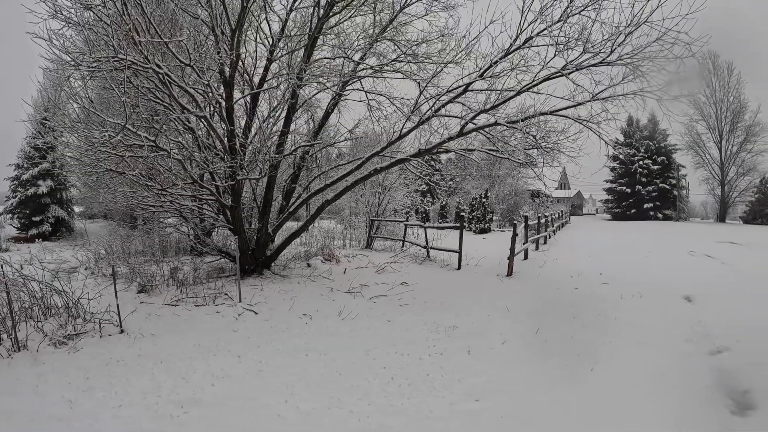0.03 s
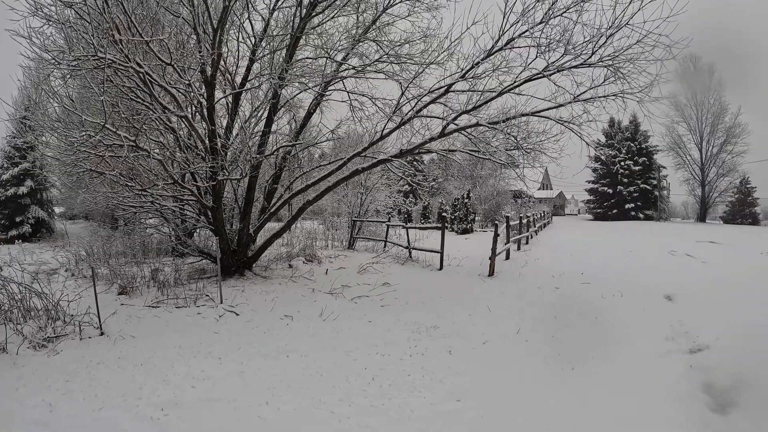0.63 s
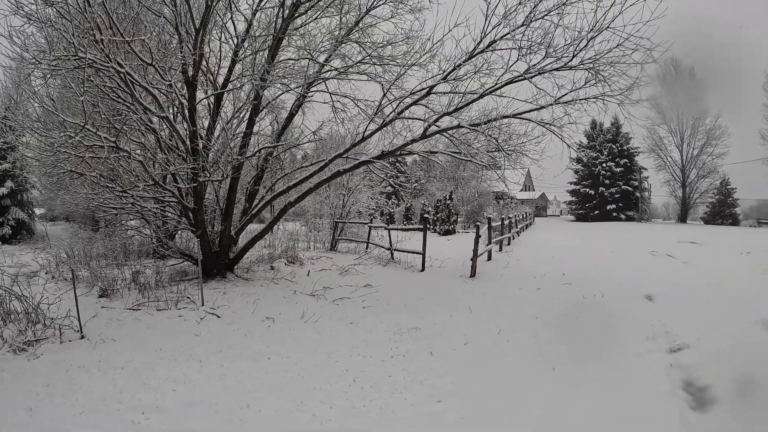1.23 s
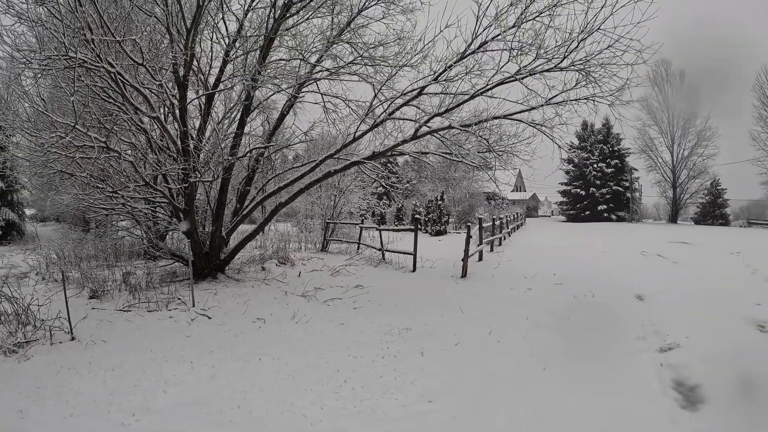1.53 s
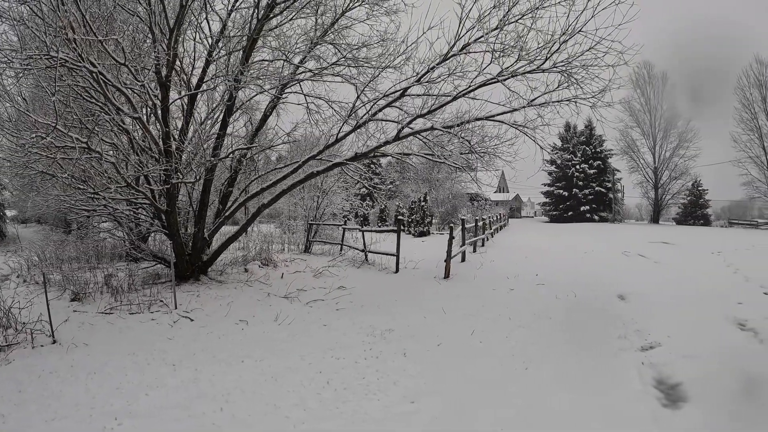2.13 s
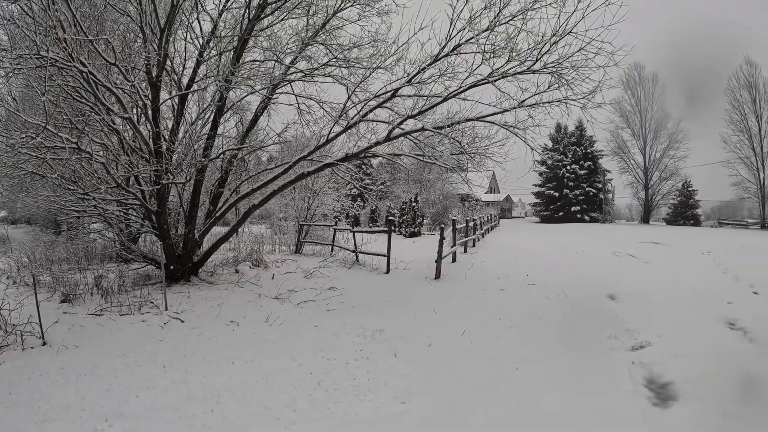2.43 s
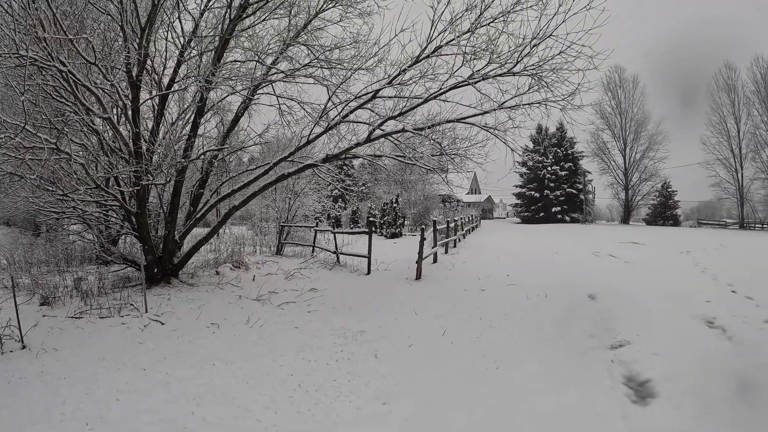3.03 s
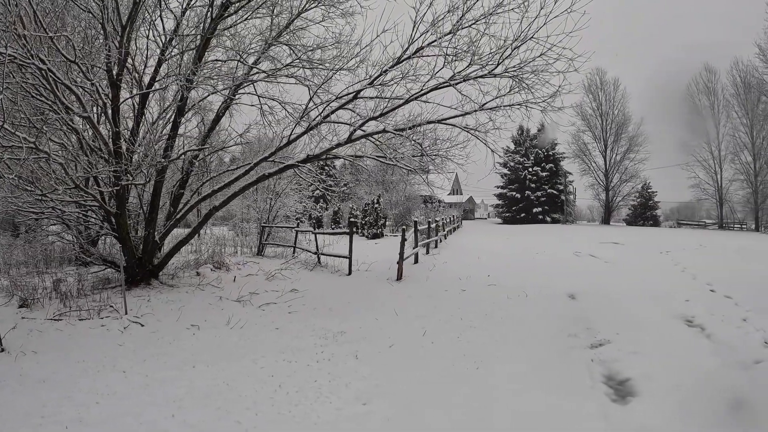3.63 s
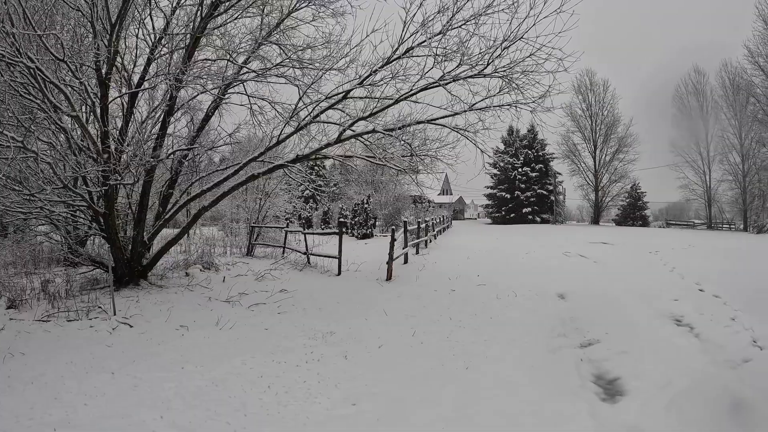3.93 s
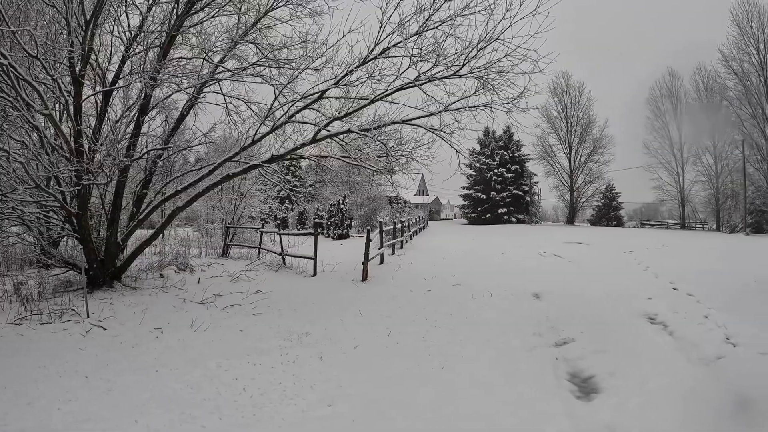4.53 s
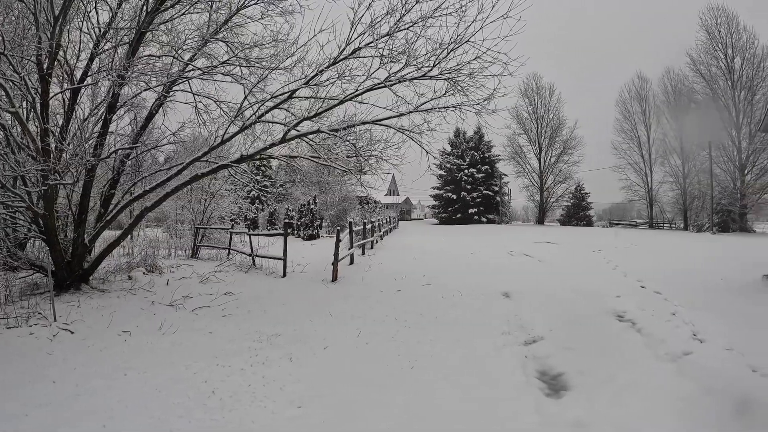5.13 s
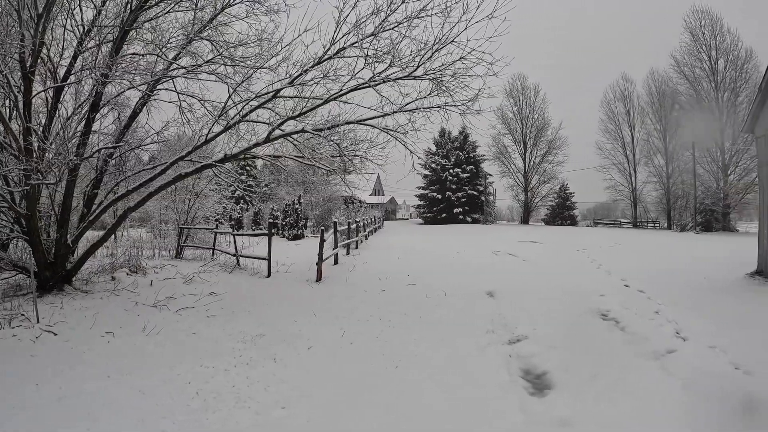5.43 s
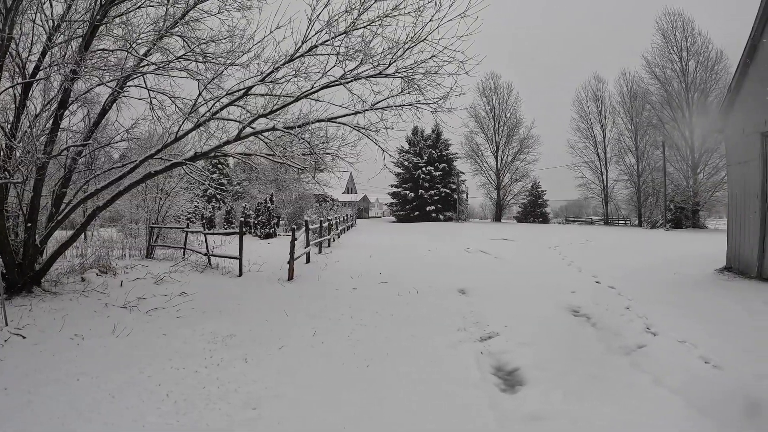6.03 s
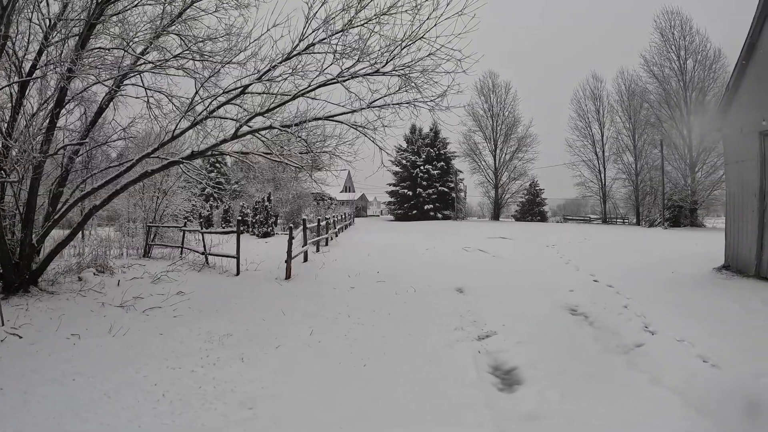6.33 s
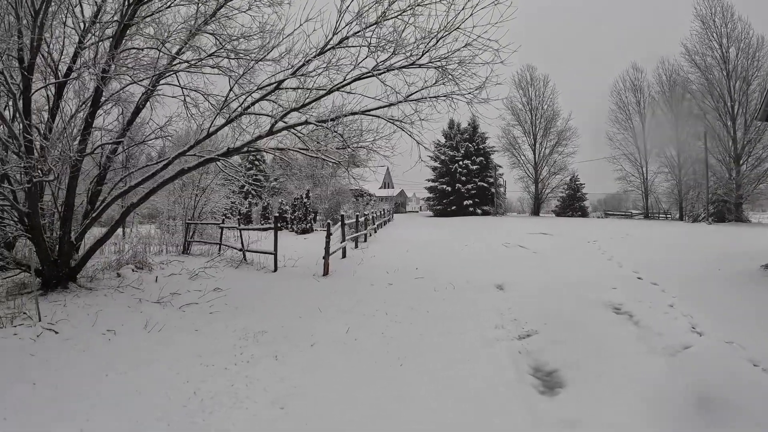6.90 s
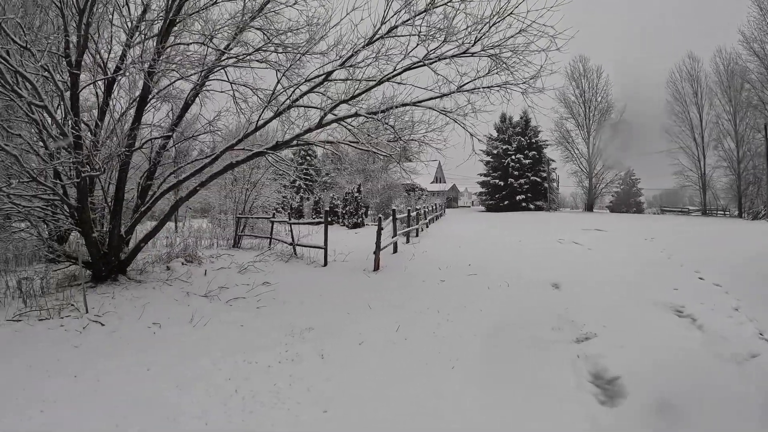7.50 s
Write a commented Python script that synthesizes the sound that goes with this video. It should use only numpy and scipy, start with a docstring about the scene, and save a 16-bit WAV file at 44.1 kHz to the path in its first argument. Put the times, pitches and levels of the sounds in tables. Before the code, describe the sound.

Geese call in the distance from start to finish, slightly to the right, in snowy woods. Their hoarse barks, clear honks, low moans and brief high yelps overlap irregularly, several a second, with a short echo from the trees. The calls are a little stronger around 2 to 3 seconds and somewhat weaker after 6. A low wind rumble on the hand-held microphone starts gently and builds from about 3 seconds, with gusts near 5.7, 6.4 and 7.5 seconds. Soft, dull knocks bump the microphone now and then, more often around 3 and 5 seconds and near the end. Snow grains tick and patter lightly close by throughout. Small birds whistle and chirp very faintly, mostly between 3 and 6 seconds. At about 7 seconds, snow gives one short, soft crunch underfoot. A quiet wash of open country air lies beneath everything.

```python
"""Geese call without pause beyond snowy woods: hoarse barks, clear honks, low moans and high yelps.
Each call is a harmonic tone of the syrinx that starts rough and breaks into full voice; trunks
scatter it into a short reverberation. A rising breeze buffets the hand-held microphone, with soft
knocks. Snow grains tick close by, snow crunches once underfoot, and small birds whistle faintly
over the wash of open country."""
import sys
import numpy as np
from scipy import signal
from scipy.fft import rfft, irfft, next_fast_len
from scipy.io import wavfile

SR = 44100
rng = np.random.default_rng(int(sys.argv[2]) if len(sys.argv) > 2 else 0)


def log_audio(samples):
    """Write samples as a 16-bit WAV file to the path given in sys.argv[1]."""
    # one column per channel
    frames = np.atleast_2d(samples).T
    # limit to full scale, then quantise
    limited = np.clip(frames, -1, 1)
    pcm = np.round(limited * 32767).astype(np.int16)
    wavfile.write(sys.argv[1], SR, pcm)


N = 342216
T = np.arange(N) / SR


def syrinx(length, hz, shape, fundamental_db, jitter=0.0074, break_s=0.006, rasp_attack_s=0.016):
    """Self-sustained oscillation with a register break, strongest in harmonic 2; returns tone and rasp."""
    start_ratio, end_ratio, third_db, roughness, break_share = shape
    size = int(length * SR)
    u = np.linspace(0, 1, size)
    voiced = .5 + .5 * np.tanh(.5 * (u - break_share) * length / break_s)
    late_glide = (end_ratio - 1) * (2 * u - 1).clip(0) ** 2
    pitch = hz * (start_ratio + (1 - start_ratio) * voiced + late_glide)
    waver = 1 + jitter * (1 + 2 * roughness) * walk(165, size)
    phase = 2 * np.pi * np.cumsum(pitch * waver) / SR
    swell = np.sin(np.pi * u).clip(0) ** .62 * undb(1.5 * walk(55, size))
    harmonics_db = [fundamental_db, 0, third_db, -31, -38]
    tone = sum(undb(db) * np.sin(k * phase) for k, db in enumerate(harmonics_db, 1))
    tone *= undb(-8 * (1 - voiced))  # weaker before the break
    # the motion repeats only every fourth cycle: smeared sidebands between the harmonics
    sidebands = sum(share * np.sin(k * phase / 4 + .8 * walk(50, size))
                    for k, share in ((7, .6), (9, .7), (10, .3)))
    breath = np.random.default_rng(rng.integers(1 << 30)).standard_normal(size) * np.sqrt(SR / 2000)
    hoarseness = roughness * 1.55 * (1 - u) * np.tanh(u * length / rasp_attack_s)
    rasp = hoarseness * (undb(-2) * sidebands + undb(-12) * breath)
    return np.sqrt(2) * swell * np.array([tone, rasp])


# Fundamental of a mid-range call, re harmonic 2: t/s, level/dB
FUNDAMENTAL_LEVEL = [(0, -25.5), (5.3, -30), (5.7, -23), (6.35, -16), (6.55, -25.5), (6.68, -3), (6.8, -21),
                     (6.92, -1.5), (7.02, -22), (7.26, -7.5), (7.7, -13)]

def call(s, length, hz, db, shape, middle_hz=564, db_per_octave=12.5):
    """Spectral balance of one call: the lower the pitch, the weaker the fundamental."""
    fundamental_db = np.interp(s, *np.transpose(FUNDAMENTAL_LEVEL))
    fundamental_db += db_per_octave * np.log2(hz / middle_hz)
    return undb(db) * syrinx(length, hz, shape, fundamental_db)


# Hoarse barks: t/s, f/Hz, level/dB, harmonic 3 re harmonic 2/dB
BARK_CALLS = [(0.005, 686, -56, -27), (0.379, 834, -56.5, -30), (0.698, 799, -55, -25),
              (0.724, 645, -49.5, -16), (0.937, 708, -52, -24), (1.308, 704, -51, -24),
              (1.597, 694, -51.5, -23), (1.956, 688, -49, -24), (2.325, 710, -46, -26.5),
              (3.434, 695, -50.5, -21), (3.698, 683, -53.5, -17), (4.178, 688, -52, -16),
              (4.416, 708, -50.5, -13.5), (4.688, 708, -53, -11.5), (4.98, 755, -51.5, -16),
              (5.251, 738, -54, -19), (6.312, 777, -52.5, -36), (6.644, 756, -60, -28),
              (6.99, 730, -55.5, -22), (7.261, 675, -56.5, -15)]

def barks(length=0.0835):
    """Irregular oscillation makes a short, rough, falling note."""
    for s, hz, db, third_db in BARK_CALLS:
        yield s, call(s, length, hz, db, (0.97, 0.92, third_db, 0.42, 0.28))


# Clear honks: t/s, duration/s, f/Hz, end f/Hz, level/dB
HONK_CALLS = [(0.038, 0.11, 622, 562, -53.5), (0.107, 0.1, 679, 647, -45.5), (0.566, 0.091, 660, 600, -52),
              (0.767, 0.105, 633, 576, -55.5), (1.118, 0.046, 620, 605, -52.5),
              (2.095, 0.064, 665, 582, -51), (3.147, 0.11, 692, 662, -49.5),
              (4.655, 0.032, 700, 715, -53.5), (6.23, 0.12, 613, 630, -59.5), (6.331, 0.115, 660, 610, -54),
              (6.377, 0.17, 683, 671, -55.5), (6.538, 0.1, 620, 640, -60.5), (6.644, 0.086, 660, 600, -69),
              (6.916, 0.063, 648, 640, -61.5), (7.064, 0.09, 660, 682, -54), (7.383, 0.093, 658, 655, -61),
              (7.641, 0.12, 656, 635, -50.5)]

def honks():
    """Nearly periodic oscillation gives a clear note with little rasp."""
    for s, length, hz, end_hz, db in HONK_CALLS:
        yield s, call(s, length, hz, db, (0.96, end_hz / hz, -24, 0.08, 0.13))


# Low moans: t/s, duration/s, f/Hz, end f/Hz, level/dB, cluck re moan/dB,
# harmonic 3 re harmonic 2/dB, share of the duration before the break
MOAN_CALLS = [(0.327, 0.3, 471, 483, -58.5, -25, -15, 0.01), (0.545, 0.2, 504, 493, -51.5, -33, -9, 0.58),
              (0.93, 0.21, 484, 477, -54, -32, -11.5, 0.26), (1.107, 0.19, 507, 457, -51.5, -15, -11, 0.41),
              (1.66, 0.17, 508, 470, -52, -20, -9, 0.25), (2.224, 0.13, 502, 473, -48.5, 0, -8, 0.3),
              (2.997, 0.15, 502.6, 476, -50, -4, -11, 0.24),
              (3.414, 0.14, 514.5, 493, -48.5, -2.5, -10, 0.22),
              (4.017, 0.16, 509, 450, -53, 3.5, -10, 0.147), (4.548, 0.12, 533, 509, -49.5, -4, -18, 0.28),
              (5.157, 0.13, 548.3, 532, -49, -7.5, -18, 0.36),
              (7.215, 0.081, 466, 450, -61.5, -27, -8, 0.15),
              (7.618, 0.088, 477, 515, -54.5, 0.5, -8, 0.47)]

def moans(lead_s=0.038, cluck_s=0.0504, cluck_ratio=1.26):
    """Register jumps: the voice drops from an opening cluck, then steps up to a held pitch."""
    for s, length, hz, end_hz, db, cluck_db, third_db, break_share in MOAN_CALLS:
        yield s - lead_s, call(s, cluck_s, cluck_ratio * hz, db + cluck_db, (0.92, 1.02, -24, 0.2, 0.4))
        yield s, call(s, length, hz, db, (0.91, end_hz / hz, third_db, 0.12, break_share))


# High yelps: t/s, f/Hz, level/dB
YELP_CALLS = [(2.465, 790, -52), (2.835, 756, -61), (3.14, 780, -52), (3.826, 776, -52.5),
              (4.21, 771.5, -53), (5.61, 772, -50.5), (5.984, 768, -50), (6.58, 733, -58.5),
              (6.795, 727, -61.5), (7.402, 744, -57.5), (7.6, 757, -57.5)]

def yelps(length=0.056):
    """Weak upper harmonics leave a brief, almost pure falling tone."""
    for s, hz, db in YELP_CALLS:
        yield s, call(s, length, hz, db, (1.01, 0.94, -34, 0.16, 0.1))


# Nasal wails: t/s, duration/s, f/Hz, harmonic 2 level/dB, harmonic 3 level/dB
WAIL_CALLS = [(0.3, 0.286, 589, -58, -77), (0.86, 0.17, 641, -70, -70.5), (1.109, 0.21, 619, -64.5, -65.5),
              (2.312, 0.2, 638, -56, -60.5), (5.483, 0.194, 646, -89, -67),
              (5.784, 0.22, 632, -72.5, -64.5), (6.994, 0.165, 637.6, -58, -66),
              (7.294, 0.15, 644, -68, -63.5)]

def wails(quaver_db=3):
    """Random amplitude modulation sets a note with a strong third harmonic quavering."""
    for s, length, hz, db, third_db in WAIL_CALLS:
        wail = call(s, length, hz, db, (0.96, 0.955, third_db - db, 0.25, 0.25))
        yield s, wail * undb(quaver_db * walk(68, wail.shape[1]))


# Throat resonance: f/Hz, gain/dB
THROAT_RESPONSE = [(500, -9.5), (820, -8.5), (950, 7), (1400, 11), (1800, -3.5), (2100, -31), (5000, -81)]

def throats(calls):
    """Source and filter: sums (onset, call) pairs, the throat resonance shaping only their rasp."""
    voices = np.zeros((2, N))
    for s, sound in calls:
        add(voices, s, sound)
    tone, rasp = voices
    return tone + colour(rasp, THROAT_RESPONSE)


# Chatter of the rest of the flock: t/s, level/dB
FLOCK_LEVEL = [(0, -78), (.45, -65), (1.6, -76), (5.8, -84), (6.17, -63), (6.5, -71), (7.76, -76)]

def far_geese(count=80, middle_hz=620, shortest_s=0.0894, range_octaves=0.55):
    """Superposition: faint barks of random timing and pitch add up to distant chatter."""
    calls = []
    for k, (when, stretch, voice) in enumerate(rng.random((count, 3))):
        hz = middle_hz * 2 ** (range_octaves * (voice - .5))
        bark = syrinx(shortest_s * (1 + stretch), hz, (0.97, 0.92, -19, 0.45, 0.28), fundamental_db=-22)
        calls.append(((k + when) / count * N / SR, bark))
    return throats(calls) * undb(curve(FLOCK_LEVEL))


def woods(x, t60_s=0.42, build_s=0.015, echo_db=-12):
    """Multiple scattering from trunks adds a tail that builds up and decays exponentially."""
    t = T[:SR]
    mid, side = rng.standard_normal((2, SR)) * undb(-60 * t / t60_s) * (1 - np.exp(-t / build_s))
    echo = widen(mid, side, side_db=-9) / np.sqrt(np.sum(mid ** 2))
    return x + undb(echo_db) * signal.fftconvolve(x[None], echo, axes=1)[:, :N]


# Strength of the buffeting: t/s, level/dB
BREEZE_LEVEL = [(0.0, -50), (3.35, -43), (3.46, -52), (3.63, -38.5), (3.87, -47), (4.8, -37), (6.57, -39.5),
                (6.65, -42), (7.76, -35.5)]
# Gusts: t/s, width/s, level/dB
GUST_PEAKS = [(2.994, 0.12, -46), (4.36, 0.05, -54), (4.85, 0.32, -53.5), (5.368, 0.098, -51),
              (5.697, 0.064, -40.5), (6.15, 0.52, -56), (6.426, 0.05, -40), (7.08, 0.094, -52),
              (7.53, 0.11, -46), (7.73, 0.02, -43)]
# Spectra of the slow buffeting and of the eddies: f/Hz, level/dB
BUFFET_SPECTRUM = [(12, -3.5), (25, 5), (55, -4.5), (100, -15), (200, -27), (450, -71)]
EDDY_SPECTRUM = [(50, 2), (170, 4), (270, -1.5), (400, -20.5), (600, -34), (2500, -118)]

def wind(lumps_db=2.8):
    """Turbulence: pressure swings slowly at the microphone ports, and gusts break into faster eddies."""
    buffet = stereo_noise(BUFFET_SPECTRUM, side_db=-5) * undb(curve(BREEZE_LEVEL) - 1 + 2 * walk(14))
    gust_power = sum(undb(db) ** 2 * np.exp(-((T - s) / width) ** 2) for s, width, db in GUST_PEAKS)
    eddies = stereo_noise(EDDY_SPECTRUM, side_db=-0.44) * np.sqrt(gust_power)
    lumps = undb(0.5 + lumps_db * walk(45))
    return buffet * pan(-0.23) + eddies * lumps * pan(-1.1)


# Soft knocks on the microphone: t/s, peak level/dB, f/Hz, width/s
KNOCK_PULSES = [(0.288, -35.5, 67.5, 0.0036), (1.798, -30.5, 39, 0.0061), (2.718, -32.5, 158, 0.0045),
                (2.982, -32, 167, 0.0029), (3.034, -30, 30.2, 0.0088), (3.294, -26, 35.5, 0.0037),
                (3.301, -36, 161, 0.0022), (4.483, -48.5, 400, 0.0011), (4.741, -31.5, 160, 0.002),
                (4.887, -47, 356, 0.00073), (4.957, -34, 148, 0.0037), (4.991, -37.5, 247, 0.00077),
                (5.066, -26.5, 39.7, 0.0066), (5.215, -25, 40.7, 0.016), (5.362, -34.5, 162, 0.0049),
                (5.635, -35, 119, 0.0046), (6.188, -37.5, 169, 0.0035), (6.495, -29, 31.7, 0.032),
                (6.925, -37, 208, 0.003), (7.036, -31.5, 44.7, 0.011), (7.092, -38, 322, 0.0006),
                (7.515, -21.5, 70, 0.0012), (7.563, -33.5, 286, 0.0011)]

def knocks():
    """A blunt impact gives a Gaussian pressure pulse, poor in high frequencies."""
    out = np.zeros(N)
    t = np.arange(-SR // 16, SR // 16) / SR
    for s, db, hz, width in KNOCK_PULSES:
        add(out, s + t[0], -undb(db) * np.exp(-.5 * (t / width) ** 2) * np.cos(2 * np.pi * hz * t))
    return out * pan(-5.5)


# Nearest snow grains: t/s, level/dB, ring f/Hz
GRAIN_TICKS = [(0.526, -63, 7000), (0.727, -63, 7100), (1.051, -56, 6850), (1.964, -54.5, 5240),
               (2.461, -56, 4550), (2.694, -52.5, 5500), (2.851, -51, 7600), (3.179, -46.5, 8450),
               (3.426, -52, 2900), (3.512, -49, 3330), (3.843, -52.5, 3450), (4.148, -45.5, 7600),
               (4.979, -53.5, 6700), (5.035, -54, 8150), (6.283, -54, 8600), (6.565, -52.5, 6050),
               (6.878, -50, 4650), (7.537, -54.5, 5200)]
# Patter of the snow: t/s, level/dB
PATTER_LEVEL = [(0, -62), (0.45, -67.5), (1.7, -66.5), (2.2, -68.5), (2.35, -66), (3.2, -63), (4.0, -66),
                (4.9, -64), (5.95, -67), (6.08, -67.5), (6.3, -61.5), (7.76, -60)]

def snow(count=1100, rise_s=0.0005, ring_s=0.00026, tail_s=0.005, spread_db=3.2):
    """Damped impacts: near grains tick with a brief ring and a soft noisy tail, over a fine patter."""
    out, t = np.zeros((2, N)), T[:600]
    rise = 1 - np.exp(-t / rise_s)
    for s, db, hz in GRAIN_TICKS:
        ring = np.exp(-t / ring_s) * np.sin(2 * np.pi * hz * t)
        tail = undb(-13) * np.exp(-t / tail_s) * rng.standard_normal(len(t))
        add(out, s, undb(db) * (ring + rise * tail))
    flurry_db = curve(PATTER_LEVEL) - 1 + 3 * walk(30)
    for when, size_rank, side in rng.random((count, 3)):
        i = int(when * N)
        db = flurry_db[i] + spread_db * min(-np.log(size_rank), 4)  # large grains are rare
        grain = rise * np.exp(-t / rise_s) * rng.standard_normal(len(t))
        add(out, i / SR, undb(db) * pan(10 * (side - .5)) * grain)
    return colour(out, [(500, -19.5), (2000, 9.5), (8300, 9.5), (10300, -0.5), (12500, 4)])


def crunch(at_s=6.932, width_s=0.02, db=-52):
    """Packed snow yields under the load of a foot in one burst of gritty noise."""
    spectrum = [(80, -6), (250, 0), (600, -12), (1100, -13), (2000, -25), (7000, -30), (10000, -43)]
    grit = colour(rng.standard_normal(N) * undb(5 * walk(400)), spectrum)
    return undb(db) * unit(grit) * np.exp(-.5 * ((T - at_s) / width_s) ** 2)


def whistle(length, start_hz, end_hz):
    """Frequency modulation: a pure tone glides and wavers."""
    u = np.linspace(0, 1, int(length * SR))
    hz = (start_hz + (end_hz - start_hz) * u) * (1 + .016 * walk(260, len(u)))
    return np.sqrt(2 * np.sin(np.pi * u).clip(0)) * np.sin(2 * np.pi * np.cumsum(hz) / SR)


# Single whistles: t/s, duration/s, start f/Hz, end f/Hz, level/dB
BIRD_NOTES = [(0.61, 0.25, 4750, 3480, -84), (2.405, 0.28, 4900, 3600, -82),
              (3.971, 0.057, 2570, 2530, -72), (4.263, 0.04, 2580, 2540, -65),
              (4.466, 0.06, 2360, 2440, -66.5), (5.114, 0.024, 2130, 2110, -66.5),
              (5.827, 0.17, 5750, 5640, -79.5), (6.537, 0.026, 3340, 3250, -63.5),
              (7.155, 0.093, 5380, 5100, -75), (7.282, 0.089, 5400, 5030, -75)]
# Repeated chirps: start t/s, end t/s, period/s, duration/s, start f/Hz, end f/Hz, level/dB
BIRD_RUNS = [(3.018, 3.72, 0.204, 0.045, 3290, 3480, -73), (2.95, 3.62, 0.07, 0.06, 5550, 5250, -83),
             (5.34, 5.88, 0.22, 0.05, 3500, 3650, -80), (5.15, 5.85, 0.07, 0.06, 5620, 5300, -83.5)]

def small_birds(pitch_spread=0.02, slip_s=0.014, spread_db=2.2):
    """Tonal glides come singly or in quasi-periodic runs, uneven in pitch, time and level."""
    out = np.zeros(N)
    for s, length, start_hz, end_hz, db in BIRD_NOTES:
        add(out, s, undb(db) * whistle(length, start_hz, end_hz))
    for first, last, period, length, start_hz, end_hz, db in BIRD_RUNS:
        for s in np.arange(first, last, period):
            pitch, slip, strength = rng.standard_normal(3)
            shift = 1 + pitch_spread * pitch
            chirp = whistle(length, shift * start_hz, shift * end_hz)
            add(out, s + slip_s * slip, undb(db + spread_db * strength) * chirp)
    return out


# Far chorus of small birds: t/s, level/dB
CHORUS_LEVEL = [(0, -81.5), (1.1, -76), (1.7, -79), (2.15, -91), (2.8, -76), (3.15, -80), (3.8, -84),
                (4.4, -69.5), (4.85, -72), (5.3, -85.5), (6.5, -77.5), (7.76, -77)]

def chorus():
    """Far trills sum incoherently, so a narrow band of shimmering noise stands for them."""
    spectrum = [(1800, -32.5), (2300, -13), (2550, -4), (2780, 1), (3050, -8), (3650, -11), (4500, -31)]
    return stereo_noise(spectrum, side_db=-1.6) * undb(curve(CHORUS_LEVEL) + 2 * walk(28)) * pan(0.84)


# Spectrum of the open country: f/Hz, level/dB
AIR_SPECTRUM = [(150, 4.5), (400, -2.5), (750, -9.5), (1300, 4.5), (2000, -3), (4000, -10.5), (7500, -16.5),
                (10300, -26.5), (12500, -25.5)]

def air(db=-69):
    """Ambient noise: a quiet broadband wash that swells with the patter of snow."""
    patter_db = curve(PATTER_LEVEL)
    swell_db = 0.99 * (patter_db - patter_db.mean())
    return stereo_noise(AIR_SPECTRUM, side_db=-5.5) * undb(db + swell_db + walk(11))


def undb(db):
    """Level to amplitude ratio."""
    return 10 ** (np.asarray(db) / 20)


def unit(x):
    """Normalisation to rms 1."""
    return x / np.sqrt(np.mean(x ** 2) + 1e-20)


def curve(rows):
    """Linear interpolation of (t/s, value) rows."""
    return np.interp(T, *np.transpose(rows))


def colour(x, points):
    """Filtering by spectral multiplication with (f/Hz, gain/dB) points."""
    hz, db = np.transpose(points)
    size = next_fast_len(N + 4096)
    f = np.maximum(np.arange(size // 2 + 1) * SR / size, 1)
    gain = undb(np.interp(np.log(f), np.log(hz), db))
    return irfft(rfft(x, size) * gain, size)[..., :N]


def walk(rate, size=N):
    """Smooth random fluctuation of spread near 1, with rate new values a second."""
    steps = np.random.default_rng(rng.integers(1 << 30)).standard_normal(4096)
    place = np.arange(size) * rate / SR
    k = place.astype(int)
    blend = .5 - .5 * np.cos(np.pi * (place - k))
    return steps[k % len(steps)] * (1 - blend) + steps[(k + 1) % len(steps)] * blend


def pan(db):
    """Channel gains for a level difference, left minus right."""
    return undb(np.array([[db], [-db]]) / 2)


def add(out, s, x):
    """Superposition of x on out from time s."""
    i = int(np.clip(s * SR, 0, N - 1))
    out[..., i:i + x.shape[-1]] += x[..., :N - i]


def widen(mid, side, side_db):
    """Sum and difference give left and right."""
    return mid + undb(side_db) * side * np.array([[1], [-1]])


def stereo_noise(points, side_db):
    """Coloured noise, partly coherent between the two ports."""
    mid, side = unit(colour(rng.standard_normal((2, N)), points))
    return widen(mid, side, side_db)


def scene():
    """Superposition of birds among the trees, a little to the right, and weather at the microphone."""
    geese = throats([*moans(), *barks(), *honks(), *yelps(), *wails()])
    birds = woods(geese + far_geese() + small_birds()) * pan(-3.5)
    return birds + chorus() + wind() + knocks() + crunch() + snow() + air()


def record(dry, fade_s=0.005, top_hz=14300):
    """Microphone response: the right port is duller than the left; the ends fade and the top is cut."""
    fade = np.minimum(np.minimum(T, T[::-1]) / fade_s, 1)
    dry = dry * np.sin(np.pi / 2 * fade) ** 2
    left = colour(dry[0], [(4000, 4.0), (8000, 4.5), (12000, -0.5)])
    right = colour(dry[1], [(7000, 5.0), (9500, -1.0), (12000, -32.5)])
    lowpass = signal.ellip(8, .2, 70, top_hz, fs=SR, output="sos")
    return signal.sosfilt(lowpass, np.array([left, right]))


dry = scene()
out = record(dry)
log_audio(out)
```